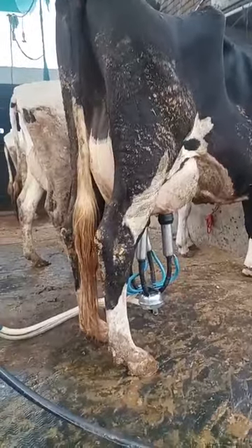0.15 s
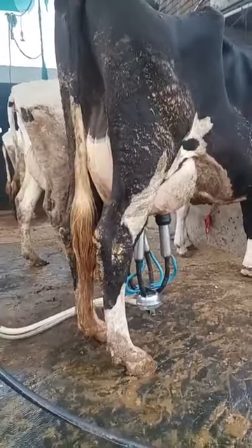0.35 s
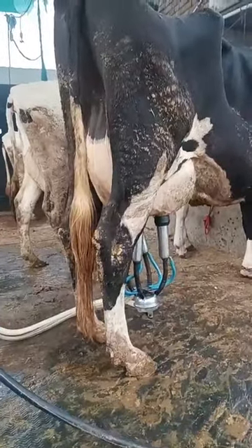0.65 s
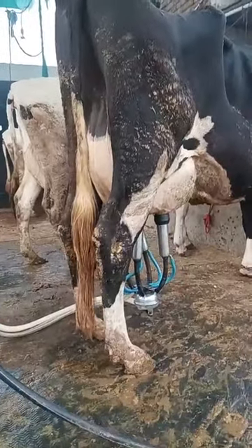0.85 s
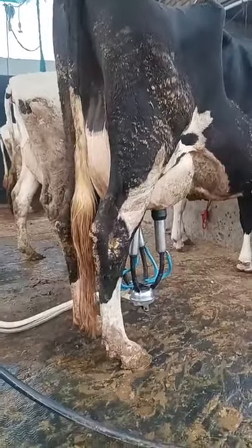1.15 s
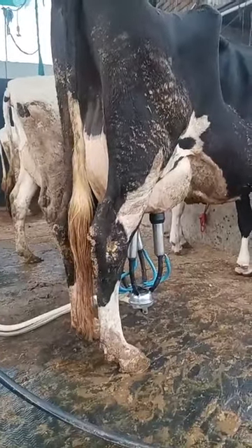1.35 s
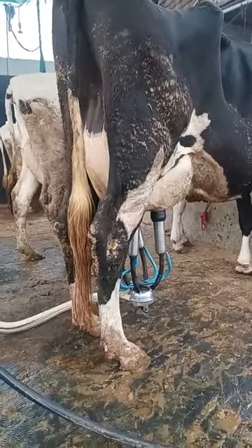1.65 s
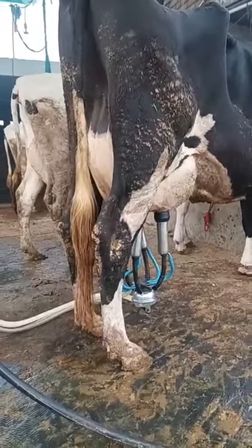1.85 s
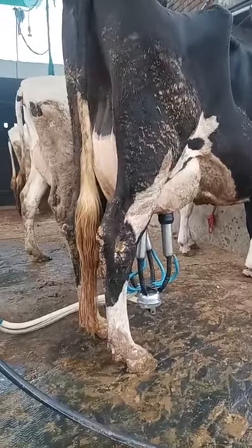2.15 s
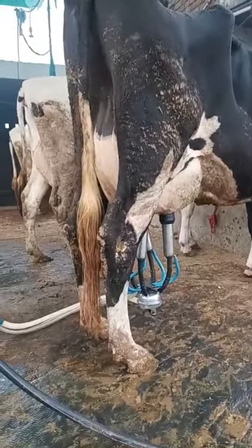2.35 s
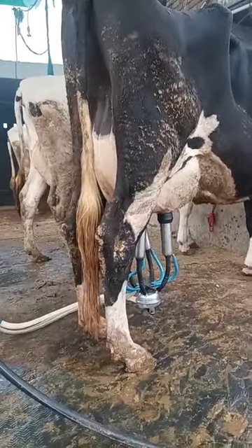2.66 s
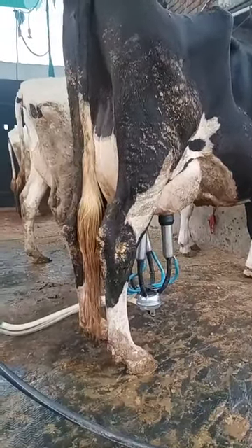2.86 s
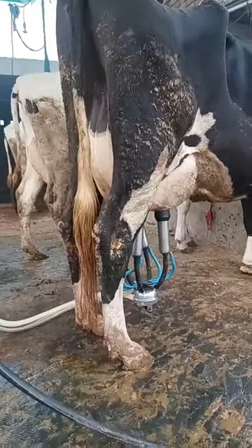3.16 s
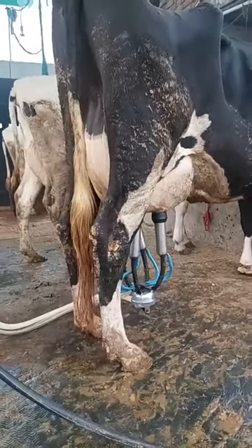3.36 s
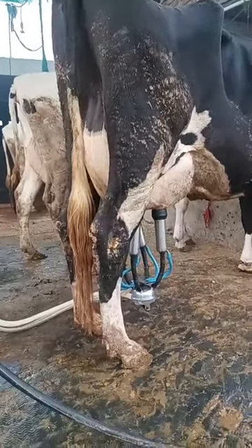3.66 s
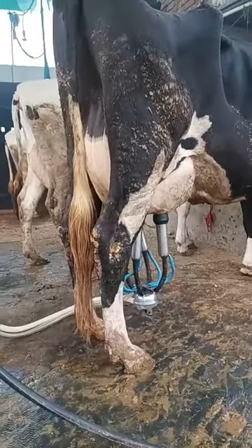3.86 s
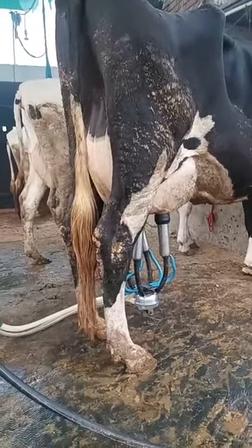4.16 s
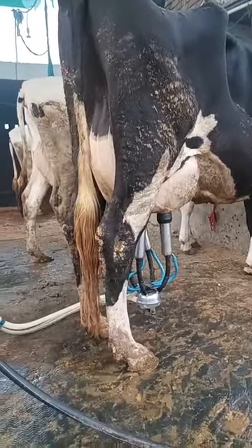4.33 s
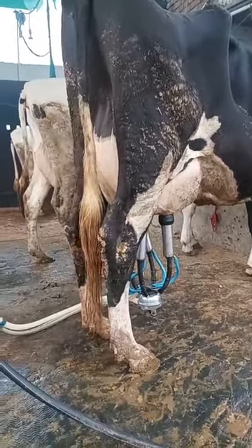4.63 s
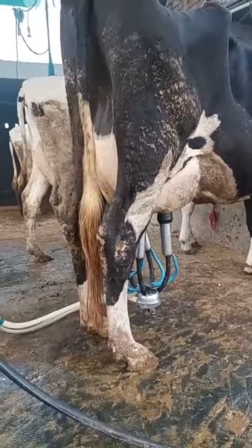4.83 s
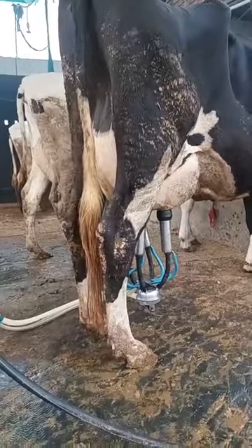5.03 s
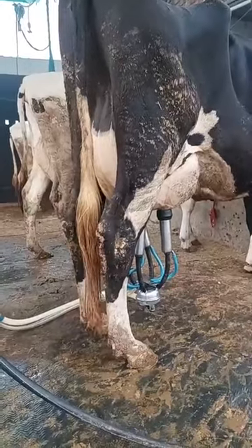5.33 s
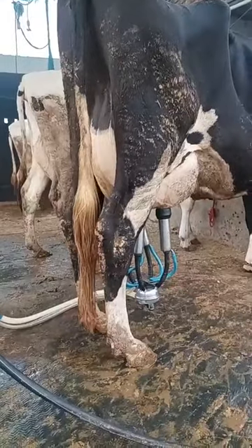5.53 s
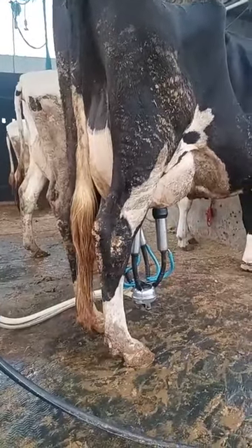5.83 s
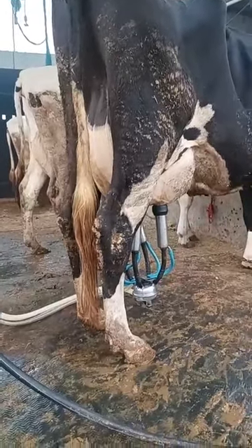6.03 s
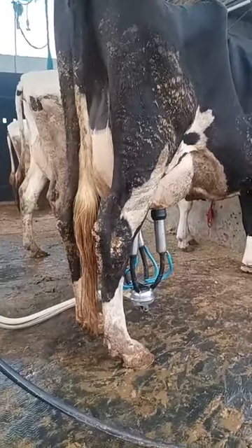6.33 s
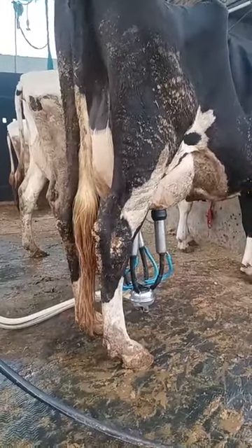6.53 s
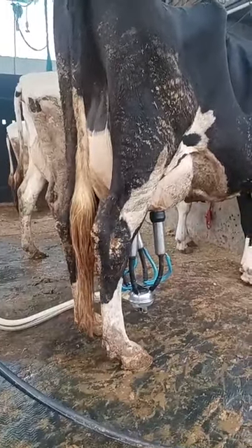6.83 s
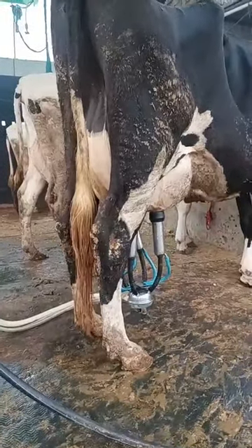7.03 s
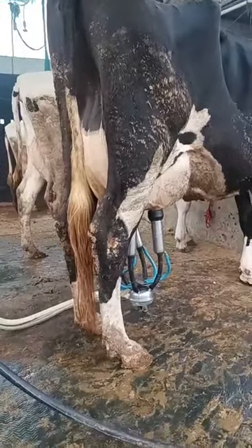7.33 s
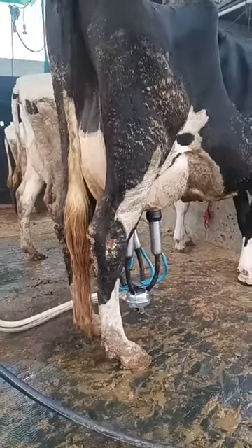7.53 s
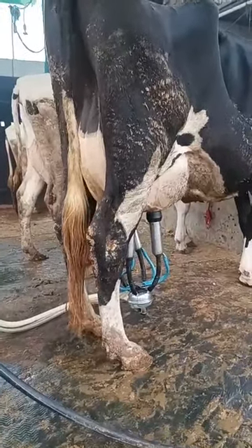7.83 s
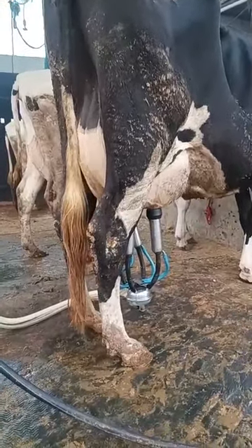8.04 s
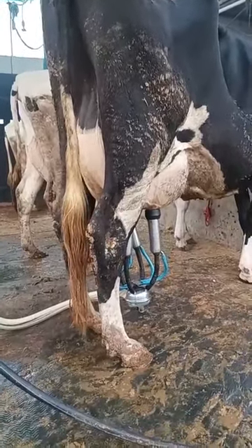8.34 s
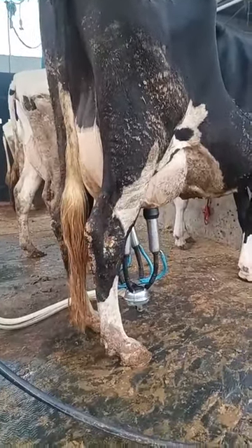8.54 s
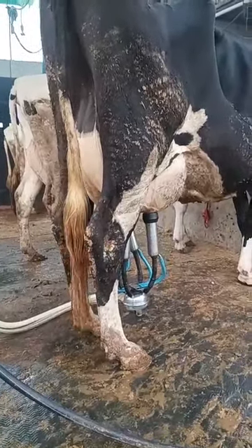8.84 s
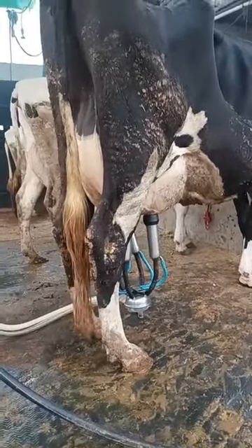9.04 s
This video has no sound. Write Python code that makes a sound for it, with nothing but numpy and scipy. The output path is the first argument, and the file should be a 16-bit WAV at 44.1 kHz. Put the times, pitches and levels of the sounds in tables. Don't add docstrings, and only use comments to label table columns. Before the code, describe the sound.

For about nine seconds a milking machine runs steadily in an open cow shed. Its valve gives a crisp metallic tick roughly every 0.3 seconds, alternating stronger and weaker, each with a small hiss of vented air and a softer refill puff about 0.2 seconds later. Behind it a far vacuum pump makes soft airy chuffs nearly six times a second, with a faint high whine, low motor hum near 106 hertz, and hollow pipe drone that surges and wavers. From 1.0 to 3.0 seconds a bird under the roof gives seven short, squeaky chirps, quickly rising then bending down; the first is soft, the sixth loudest. Dull hooves shift faintly at 0.5, 2.0 and 3.0, lower and heavier at 3.8, softly at 6.3, twice around 7.5, then most firmly at 8.3 and 9.0. Short diffuse echo, phone microphone, rolled-off treble.

```python
import sys
import numpy as np
from scipy import signal
from scipy.fft import irfft, next_fast_len
from scipy.io import wavfile
from scipy.ndimage import uniform_filter1d

SR = 44100
rng = np.random.default_rng(int(sys.argv[2]) if len(sys.argv) > 2 else 0)


def invert_db(level):
    return 10 ** (np.asarray(level, dtype=float) / 20)


def inscribe(sig):
    pcm = np.round(np.clip(np.atleast_2d(sig).T, -1, 1) * 32767)
    wavfile.write(sys.argv[1], SR, pcm.astype(np.int16))


N = 405043
T = np.arange(N) / SR

# time in seconds, stroke level in dB, motor level in dB.
PUMP_LOAD = [(0, -44, -52.5), (1.1, -42.5, -50.5), (2, -44, -52), (2.7, -44.5, -52), (3.6, -42.5, -49),
             (4.6, -43.5, -54.5), (5.6, -40, -51), (6.5, -43, -50.5), (7.6, -43, -46), (9.18, -41, -49)]


def noise(gain):
    size = next_fast_len(N)
    re, im = rng.standard_normal((2, size // 2 + 1))
    f = np.arange(size // 2 + 1) * SR / size + 1e-3
    x = irfft((re + 1j * im) * gain(f), size)[:N]
    return x / np.std(x)


def ringing(modes, order=1):
    def response(f):
        return sum(invert_db(db) / (1 + (2 * (f - hz) / width) ** 2) ** order for hz, width, db in modes)
    return noise(response)


def colour(points, f):
    hz, db = np.transpose(points)
    return np.interp(np.log(f), np.log(hz), db)


def walk(rate):
    k = int(SR / rate)
    held = np.repeat(rng.standard_normal(N // k + 1), k)
    return 1.3 * uniform_filter1d(uniform_filter1d(held, k), k)[:N]


def strike(times, db, rise, fall):
    train = np.zeros(N)
    inside = (times >= 0) & (times < T[-1])
    train[(times[inside] * SR).astype(int)] = invert_db(db[inside])
    t = T[:SR // 2]
    shape = np.exp(-t / fall) * (1 - np.exp(-t / rise))
    return signal.fftconvolve(train, shape / shape.max())[:N]


def hump(centres, db, length, flat=1.0):
    out = np.zeros(N)
    for c, d in zip(centres, db):
        near = slice(max(int((c - length) * SR), 0), max(int((c + length) * SR), 0))
        out[near] += invert_db(d) * np.cos(np.pi / 2 * (T[near] - c) / length).clip(0) ** flat
    return out


def swell(centres, db, length):
    near = ((T[::64, None] - centres) / length).clip(-1, 1)
    return np.repeat((db * np.cos(np.pi / 2 * near) ** 2).sum(axis=1), 64)[:N]


def echo(x, t60, gap):
    t = T[:SR // 2]
    decay = 1000. ** (-t / t60)
    tail = rng.standard_normal(len(t)) * decay * (1 - np.exp(-t / gap))
    return signal.fftconvolve(x, tail / np.linalg.norm(tail))[:N]


def motor():
    # centre in seconds, extra level in dB.
    throbs = [(1.15, 9), (1.6, 7), (2.4, 8), (2.88, 11.5), (3.05, 4), (3.5, 4), (4.25, 9), (4.41, 11),
              (4.91, 12), (5.1, 6), (6.35, 11), (6.72, 6), (7.08, 7), (7.75, 2), (8.4, 8), (8.93, 10)]
    level_db = np.interp(T, *np.transpose(PUMP_LOAD)[::2]) + swell(*np.transpose(throbs), 0.053) - 2.0
    line_hz = 106.4 + 1.87 * walk(9.7)
    line = 1.29 * np.sin(2 * np.pi * np.cumsum(line_hz) / SR)
    return invert_db(level_db) * (line + 0.8 * ringing([(105.8, 11, 0)]))


def pipeline():
    # centre in seconds, surge in dB, pipe note in dB.
    surges = [(0.0, 7, 17), (0.55, 4.5, -3.5), (0.97, 4.5, 2), (1.3, 3.5, -1), (1.43, -0.5, 11.5),
              (1.51, 5.5, 2), (1.72, 5.5, 4), (2.32, -1, 9), (2.72, 2.5, 7.5), (2.85, 5, 9), (3.4, 3, 11.5),
              (3.63, 5, -7), (4.02, 5, 8), (4.379, 5.5, 4), (4.55, 4.5, 4), (4.78, 8, 10.5), (5.18, 1, 3),
              (5.4, 6.5, 6), (5.548, 7, 5), (5.71, 6, 4), (6.06, 1.5, 7.5), (6.24, -0.5, 3),
              (6.41, -1.5, 6), (6.68, 5.5, 0), (6.85, 6.5, 5), (7.18, 1.5, 7), (7.87, 5.5, 5),
              (8.03, 3, 14.5), (8.31, -0.5, 9.5), (9.018, 4.5, 14.5)]
    # frequency in Hz, width in Hz, level in dB.
    tank = [(208.3, 31, -4), (250.8, 26, -2), (297.6, 35.5, 1), (330.5, 30, -0.5)]
    # frequency in Hz, width in Hz, level in dB.
    pipe_note = [(582, 25.6, 8.5), (578, 13, -6.5)]
    # frequency in Hz, width in Hz, level in dB.
    pipes = [(683, 112, -2.5), (787, 29.4, -1.5), (1104.8, 39, -2.5), (1140, 320, -8.5), (1345, 45, -5.5),
             (1631, 69, -1.5)]
    # frequency in Hz, level in dB per Hz.
    shed = [(20, -43), (45, -12), (150, -11.5), (330, -19.5), (410, -12), (620, -6.5), (900, -10),
            (1700, -9.5), (2100, -15), (3300, -16.5), (3450, -35), (5700, -27.5), (7300, -32),
            (10000, -45.5)]
    s, surge_db, sings_db = np.transpose(surges)
    surge_s = 0.071
    surge = swell(s, surge_db, surge_s)
    tank_db = -46 + 1.08 * surge + 1.5 * walk(9)
    note_db = -49.5 + swell(s, sings_db, surge_s) + 2 * walk(8.5)
    pipe_db = -44 + surge
    out = invert_db(tank_db + 2.63) * ringing(tank) + invert_db(note_db + 2.76) * ringing(pipe_note)
    for hz, width, db in pipes:
        flutter_db = 3 * walk(8)
        out += invert_db(pipe_db + db - 4.5 + flutter_db) * ringing([(hz, width, 0)])
    hush = noise(lambda f: invert_db(colour(shed, f)))
    band = signal.butter(2, (350, 2100), "band", fs=SR, output="sos")
    middle = signal.sosfilt(band, hush)
    breathing = invert_db(1.1 * (pipe_db - pipe_db.mean())) - 1
    return out + invert_db(-43) * (hush + breathing * middle)


def pump():
    # frequency in Hz, width in Hz, level in dB.
    exhaust = [(2724, 930, 3.5), (3130, 156, -5)]
    # frequency in Hz, width in Hz, level in dB.
    exhaust_top = [(5530, 1060, 17.5), (4200, 540, -21)]
    # frequency in Hz, width in Hz, level in dB.
    whine_modes = [(3148, 56, -2), (3234, 90, -5.5)]
    stroke_s, scatter_db = 0.171, 0.9
    s = np.arange(0.09, T[-1] + stroke_s, stroke_s)
    jitter, low_chance, top_chance = rng.standard_normal((len(s), 3)).T
    s = s + 0.003 * jitter
    low_db = np.interp(s, *np.transpose(PUMP_LOAD)[:2]) + scatter_db * low_chance
    gust_db = 1.4 * walk(70)
    low = hump(s, low_db + 2.5, 0.094, flat=2.48) * ringing(exhaust, order=2) * invert_db(gust_db)
    top_db = -56 + scatter_db * top_chance
    top = hump(s - 0.012, top_db + 7.5, 0.071, flat=2.3) * ringing(exhaust_top) * invert_db(0.52 * walk(70))
    whine_db = -51.5 + swell(s + 0.022, 3.5, stroke_s / 2) + 2.6 * walk(11) + 1.3 * walk(30)
    return low + top + invert_db(whine_db) * ringing(whine_modes, order=2)


def pulsator():
    # time in seconds, tick level in dB, following air in dB.
    ticks_over = [(0.0367, -43, -1), (0.621, -42, -4.5), (1.2092, -44.5, -6.5), (1.797, -43, -3),
                  (2.3796, -39.5, -1), (2.9697, -43, -3), (3.56, -43.5, -5), (4.147, -42.5, -4),
                  (4.7315, -42.5, -6.5), (5.3203, -40.5, -4.5), (5.905, -40, -6), (6.4903, -43, -6),
                  (7.0695, -40.5, -11), (7.654, -41.5, -8), (8.2356, -42, -5), (8.8173, -43, -4)]
    # time in seconds, tick level in dB, following noise in dB (at 2.68 s a strong
    ticks_back = [(0.335, -46, -3.5), (0.9218, -44.5, .5), (1.512, -47.5, 1), (2.0887, -50, -2),
                  (2.68, -45.5, 9), (3.274, -44.5, -3.5), (3.858, -45.5, -3), (4.4433, -47, -5),
                  (5.0327, -47.5, -3), (5.616, -44.5, -2), (6.2033, -43, -5), (6.783, -47, -4),
                  (7.3672, -42.5, -2), (7.9478, -45, 1), (8.5334, -43.5, -4.5), (9.1147, -46.5, 1)]
    # delay after the tick in seconds, length in seconds, level in dB.
    refills = [
        (0.188, 0.053, -50.5),
        (0.203, 0.056, -54),
    ]
    # frequency in Hz, width in Hz, level in dB.
    valve_modes = [(3240, 410, 1), (3780, 910, 0.5), (6030, 1350, -3), (7006, 540, 3), (8100, 170, -7),
                   (10130, 710, -15)]
    # frequency in Hz, width in Hz, level in dB.
    vent = [(2900, 170, 3), (5770, 1800, 1.5), (6900, 770, -0.5), (7800, 470, -30)]
    # frequency in Hz, width in Hz, level in dB.
    liner_modes = [(4230, 2300, -0.5), (7060, 770, -5)]
    s, db, air_db = np.transpose(ticks_over + ticks_back)
    bounce = strike(s + 0.0054, db - 17.5, 0.00036, 0.034)
    knock = strike(s, db, 0.00051, 0.0035) + bounce
    out = invert_db(10) * knock * ringing(valve_modes)
    out += strike(s, db - 1, 0.00022, 0.0015) * noise(lambda f: (f > 3300) * f ** 0.71)
    sputter_db = 3 * walk(90)
    out += strike(s + 0.013, air_db - 44.0, 0.009, 0.023) * invert_db(sputter_db) * ringing(vent)
    liner = ringing(liner_modes) * invert_db(3.0 * walk(80))
    for side, (delay, length, side_db) in zip((ticks_over, ticks_back), refills):
        refill_db = side_db + 1.8 + 2.3 * rng.standard_normal(len(side))
        out += hump(np.transpose(side)[0] + delay, refill_db, length) * liner
    return out


def hooves():
    # start in seconds, peak level in dB, pitch in Hz.
    steps = [
        (0.522, -53, 205),
        (1.982, -43, 212),
        (3.046, -40, 211),
        (3.769, -37.5, 139),
        (6.279, -43, 210),
        (7.457, -42, 204),
        (7.597, -42, 182),
        (8.314, -31.5, 197),
        (8.977, -33.5, 187),
    ]
    out = np.zeros(N)
    for s, db, hz in steps:
        start = int(s * SR)
        t = T[:min(SR // 5, N - start)]
        shape = t / 0.025 * np.exp(1 - t / 0.022)
        out[start:start + len(t)] += invert_db(db - 3.0) * shape * np.sin(2 * np.pi * hz * t)
    return out


def chirp_contour(peak, close, top_hz, low_hz, db, cold_db):
    sagged, shut = close - 0.022, close + 0.015
    rise = 0.023 - 0.018 * (top_hz - 4600) / 1000
    bend_s = peak + np.r_[0.2516, 0.58] * (sagged - peak)
    bend_hz = top_hz - np.r_[0.36, 0.52] * (top_hz - low_hz)
    start_hz = 0.69 * top_hz
    s = np.r_[peak - rise - 0.008, peak - rise, peak, bend_s, sagged, close, shut, shut + 0.005]
    hz = np.r_[0.82 * start_hz, start_hz, top_hz, bend_hz, low_hz, 1.025 * low_hz, 0.88 * low_hz, 0.84 * low_hz]
    opening_db = np.r_[-25 - 2 * cold_db, -10 - 0.018 * cold_db ** 3, -5 - 0.45 * cold_db, -2.5 - 0.3 * cold_db]
    level_db = db + np.r_[opening_db, -1.5, 0, -3, -9, -28]
    return s, hz, level_db


def bird():
    # pitch peak in seconds, closing in seconds, peak in Hz and sagged pitch in Hz
    # (both of the second harmonic), level in dB.
    chirps = [
        (1.023, 1.101, 4550, 4080, -35.5),
        (1.36, 1.456, 4860, 3864, -31.5),
        (1.619, 1.694, 4714, 3827, -28.5),
        (2.054, 2.147, 4940, 3666, -30),
        (2.324, 2.402, 4740, 3602, -30),
        (2.609, 2.691, 4560, 3577, -27.5),
        (2.873, 2.958, 4500, 3527, -28.5),
    ]
    # frequency in Hz, level in dB.
    throat = [(4400, -3), (4900, -6), (5300, 2), (5600, -2), (5900, -9), (6300, -19), (6800, -24),
              (7500, -28)]
    # frequency in Hz, level in dB.
    beak = [(1400, -55), (1900, -23.5), (2250, -8.5), (2600, -12), (6500, -19.5), (7200, -20.5),
            (8200, -25.5), (10500, -64)]
    warm_up_db_s, warm_s = 11, 2
    out = np.zeros(N)
    flutter, quaver = invert_db(1.5 * walk(220)), 1 + 0.0045 * walk(200)
    husk = 0.9 + 0.4 * noise(lambda f: 1 / (1 + (f / 250) ** 2))
    for peak, close, top_hz, low_hz, db in chirps:
        cold_db = warm_up_db_s * max(warm_s - peak, 0)
        s, hz, level_db = chirp_contour(peak, close, top_hz, low_hz, db, cold_db)
        on = slice(int(s[0] * SR), int(s[-1] * SR))
        t = T[on]
        pitch = uniform_filter1d(np.interp(t, s, hz), size=400) / 2 * quaver[on]
        phase = 2 * np.pi * np.cumsum(pitch) / SR
        second = np.interp(t, s, level_db)
        third = second + colour(throat, 3 * pitch) - 0.9 * cold_db
        third -= 8 * ((t < peak) | (t > close))
        voice = invert_db(second) * np.sin(2 * phase) + invert_db(third) * np.sin(3 * phase)
        for k in (1, 4, 5):
            voice += husk[on] * invert_db(second + colour(beak, k * pitch)) * np.sin(k * phase)
        out[on] = 2.4 * voice * flutter[on]
    peaks, loud = np.transpose(chirps)[[0, 4]]
    catch_db = loud - 14 - warm_up_db_s * (warm_s - peaks).clip(0)
    catch = ringing([(2460, 250, -13), (5200, 1600, -14)])
    out += strike(peaks - 0.023 - 0.008, catch_db, 0.008, 0.019) * catch
    rush = ringing([(2300, 310, 4), (5700, 5400, -14), (6930, 700, -12)])
    breath = uniform_filter1d(np.abs(out), size=600) * rush
    rasp = noise(lambda f: (f > 200) / (1 + (f / 1800) ** 4))
    return out * (1 + 0.27 * rasp) + invert_db(-14) * breath


def scene():
    song, valve = bird(), pulsator()
    turbulence = 1 + 1.1 * noise(lambda f: 1 / (1 + (f / 160) ** 2))
    dry = song + invert_db(-7.5) * echo(song * turbulence, t60=0.24, gap=0.008)
    dry += valve + invert_db(-2) * echo(uniform_filter1d(valve, size=4), t60=0.23, gap=0.006)
    return (dry + motor() + pipeline() + pump() + hooves())[None]


def thin(x, under_db, patchy_db, size=2048):
    # frequency in Hz, level in dB.
    line_floor = [(1500, -95), (2200, -87), (3300, -83), (3550, -80.5), (4200, -85.5), (5000, -81.5),
                  (8000, -99.5), (9600, -92), (9900, -66.5)]
    frames = dict(window="cosine", nperseg=size, noverlap=size // 2)
    f, _, z = signal.stft(x, SR, **frames)
    mask = np.sqrt(uniform_filter1d(np.abs(z) ** 2, size=60, axis=0)) * invert_db(under_db)
    mask = mask * np.clip((f[:, None] - 1200) / 1800, 0.25, 1)
    luck = rng.standard_normal((len(f) // 12 + 1, z.shape[1]))
    luck = np.repeat(luck, 12, axis=0)[:len(f)]
    luck = np.sqrt(2) * uniform_filter1d(luck, size=2, axis=1)
    threshold = np.maximum(mask, invert_db(colour(line_floor, f + 1))[:, None]) * invert_db(patchy_db * luck)
    kept = 1 / (1 + (threshold / (np.abs(z) + 1e-12)) ** 6)
    return signal.istft(z * kept, SR, **frames)[1][:N]


def band_limit(x):
    return signal.sosfilt(signal.butter(12, 15720, fs=SR, output="sos"), x)


def record(dry):
    top_cut = signal.ellip(10, 0.2, 60, 10600, fs=SR, output="sos")
    cut = signal.sosfilt(top_cut, dry[0])
    treble = signal.sosfiltfilt(signal.butter(4, 8800, "high", fs=SR, output="sos"), cut)
    quick, slow = (uniform_filter1d(treble ** 2, size=k) for k in (200, 4000))
    click = treble * (quick / (slow + 1e-14) / 3 - 1).clip(0, 1)
    hiss = invert_db(-94) * rng.standard_normal(N)
    mix = thin(cut - click, under_db=-5.5, patchy_db=9.0) + click + hiss
    return band_limit(mix[None])


dry = scene()
out = record(dry)
inscribe(out)
```